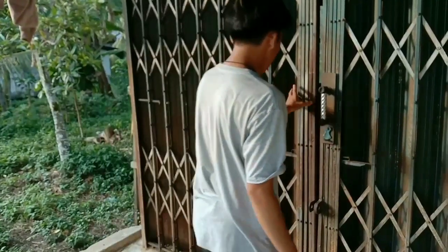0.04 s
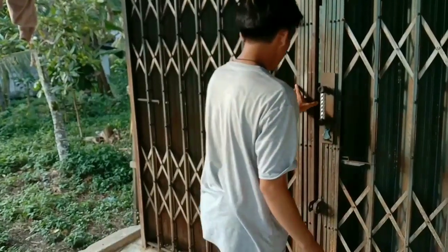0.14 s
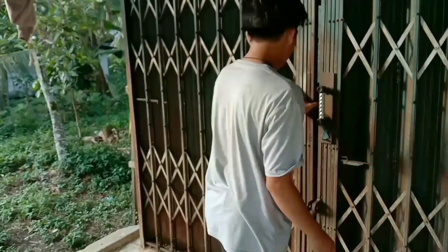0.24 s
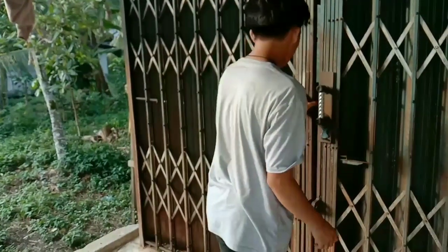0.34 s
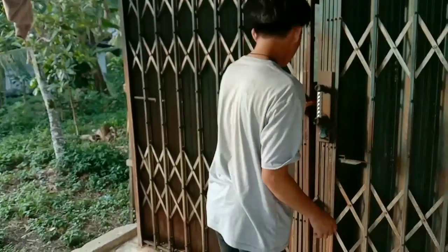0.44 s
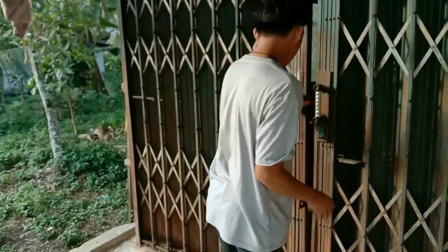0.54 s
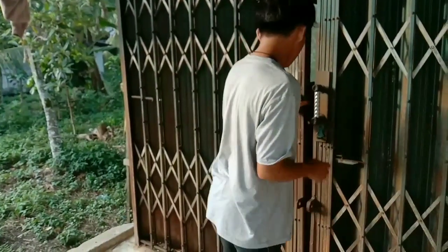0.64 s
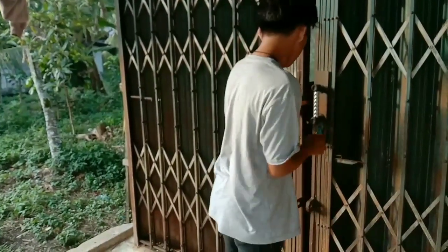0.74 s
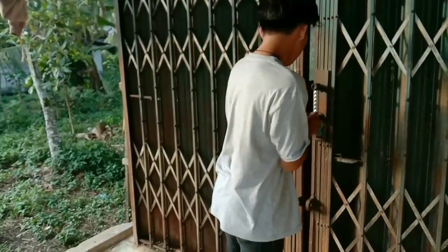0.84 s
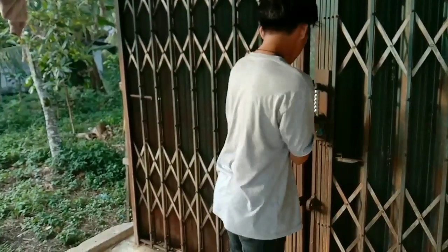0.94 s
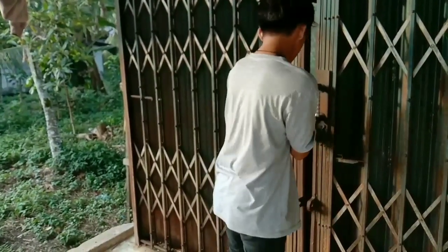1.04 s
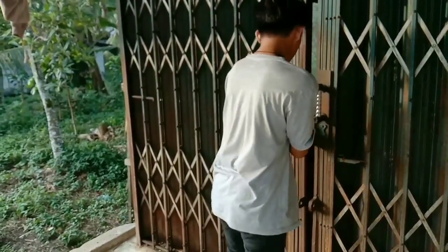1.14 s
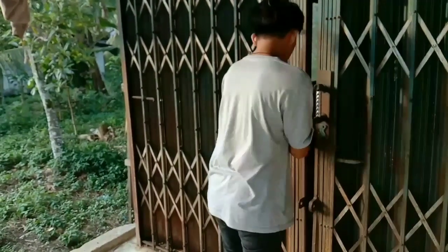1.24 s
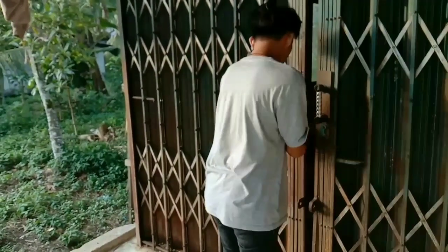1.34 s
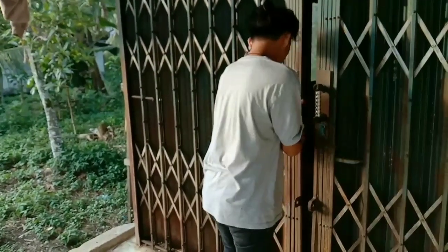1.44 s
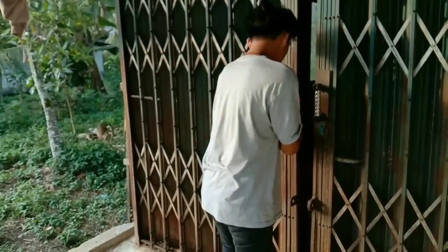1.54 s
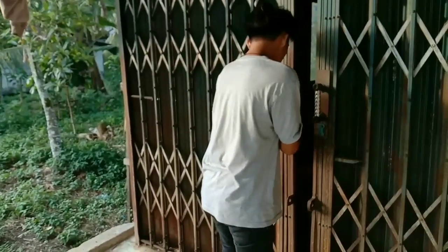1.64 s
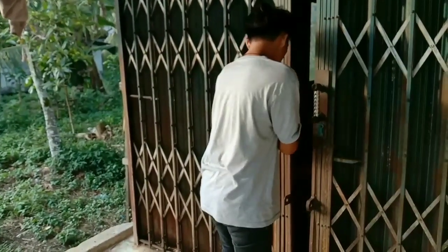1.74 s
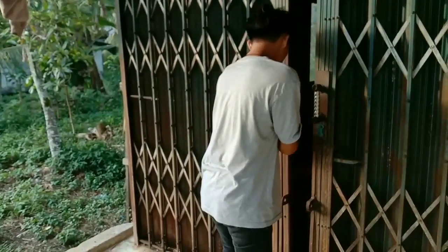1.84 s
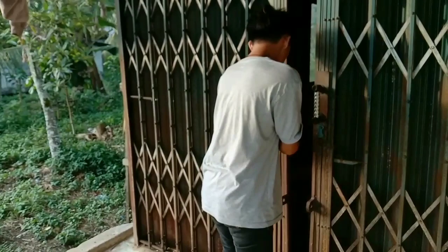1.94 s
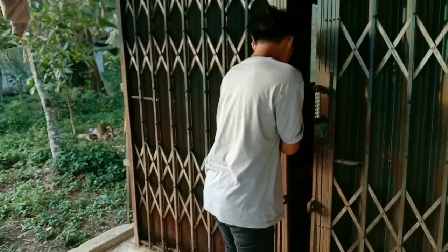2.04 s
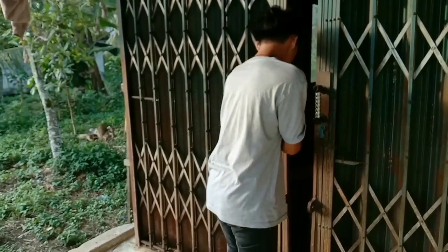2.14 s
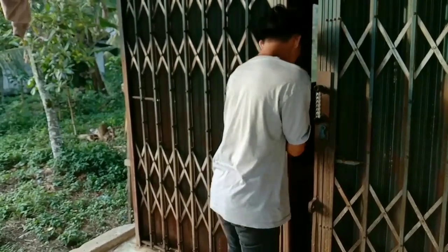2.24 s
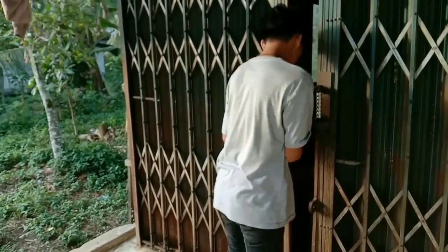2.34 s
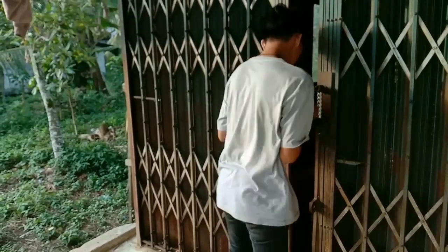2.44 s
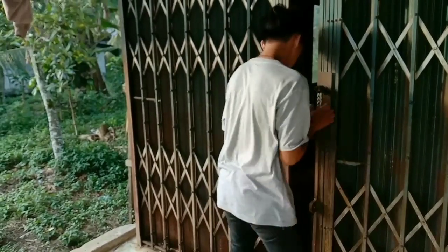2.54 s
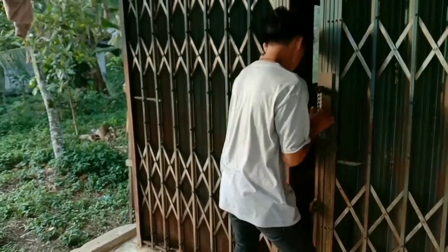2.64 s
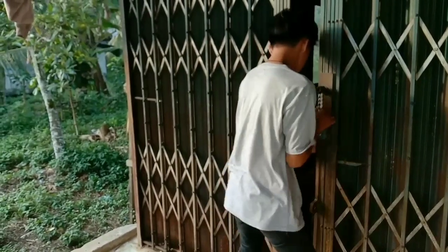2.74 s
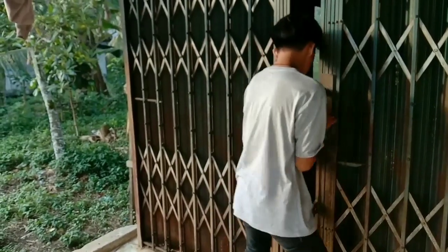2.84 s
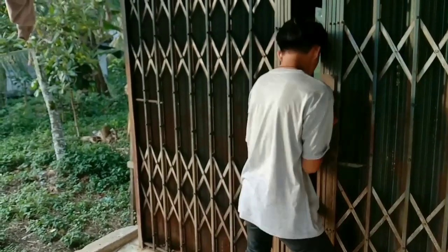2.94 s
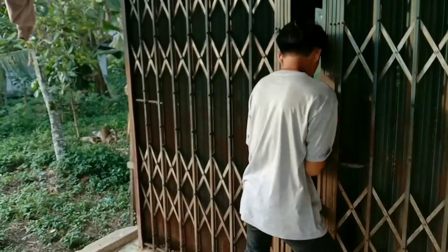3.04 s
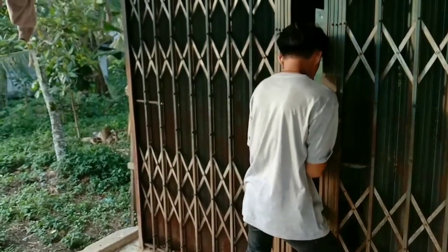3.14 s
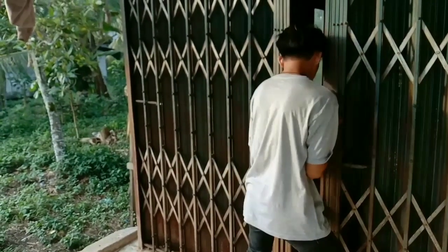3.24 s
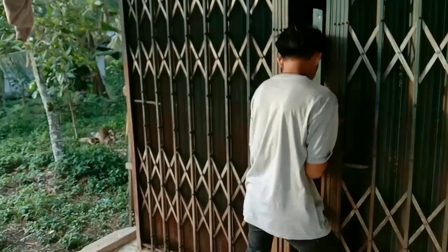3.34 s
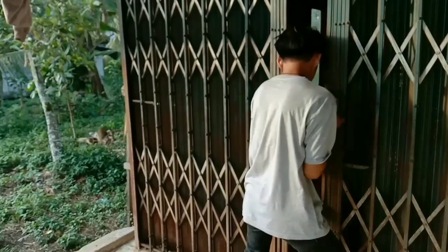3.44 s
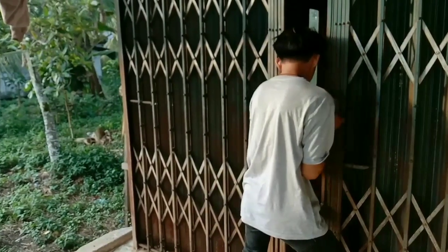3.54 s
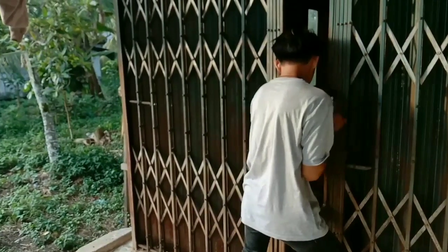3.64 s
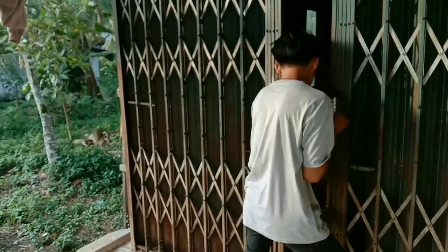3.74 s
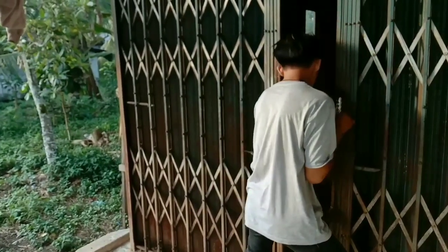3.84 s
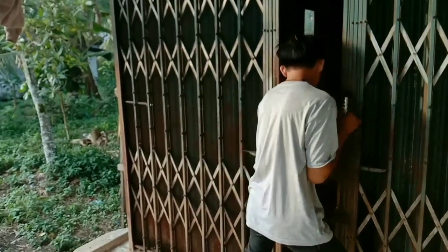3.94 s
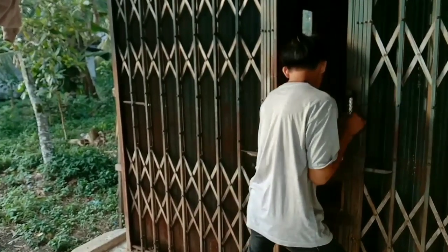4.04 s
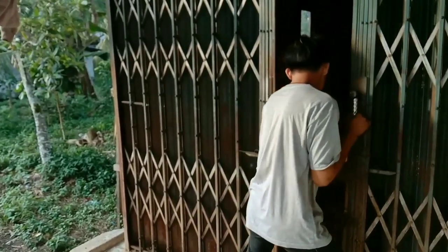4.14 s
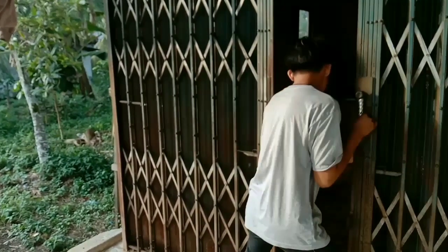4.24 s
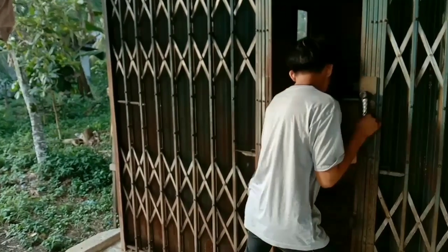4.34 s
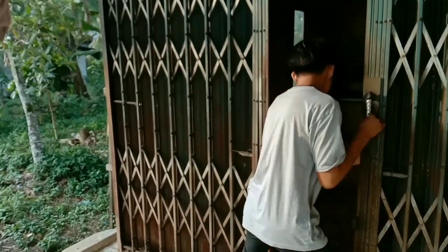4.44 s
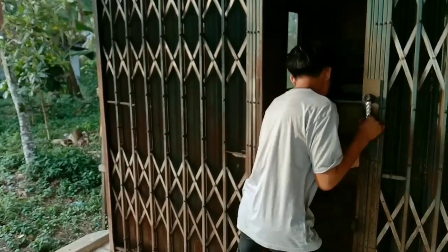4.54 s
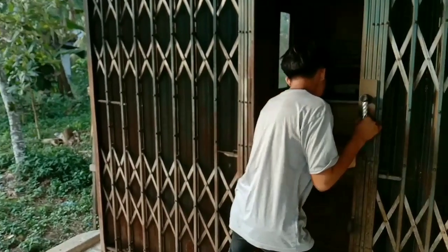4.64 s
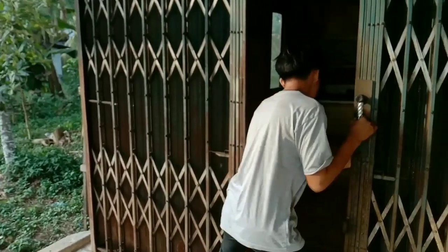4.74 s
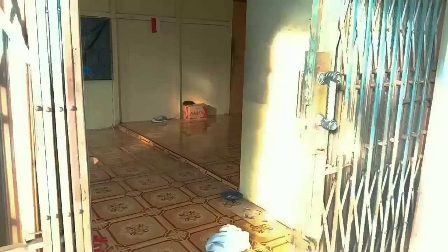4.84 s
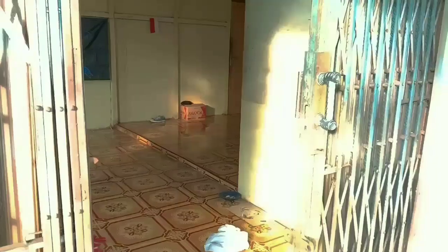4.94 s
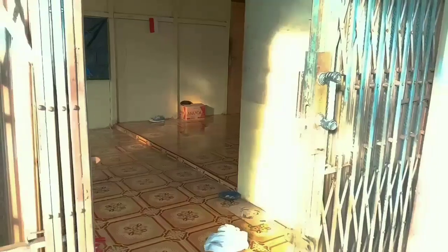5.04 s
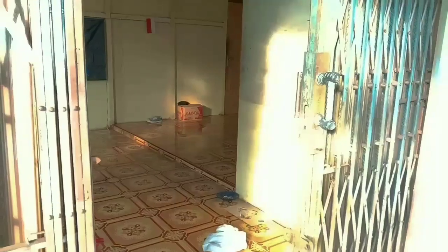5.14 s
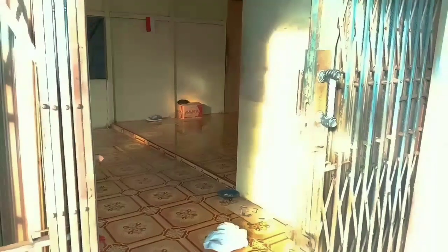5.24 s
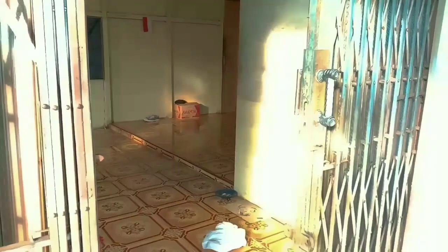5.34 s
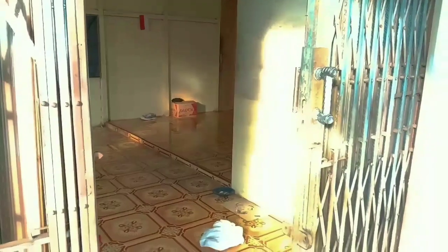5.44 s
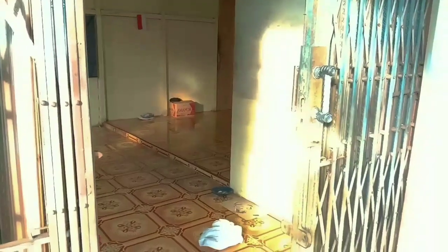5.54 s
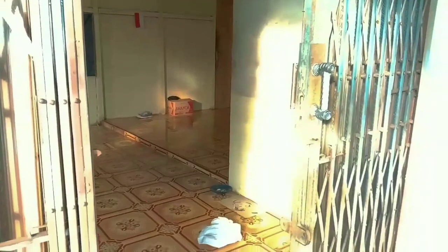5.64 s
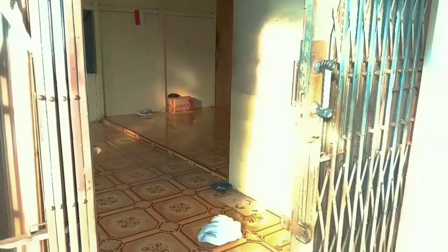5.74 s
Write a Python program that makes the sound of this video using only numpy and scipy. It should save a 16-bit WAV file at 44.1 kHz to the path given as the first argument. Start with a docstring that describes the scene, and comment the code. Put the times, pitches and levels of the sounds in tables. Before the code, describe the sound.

A folding steel gate is unlatched, jerked loose with loud slat clashes, then rumbles and squeals open beside a quiet garden.

```python
"""At a garden entrance, a folding steel gate is unlatched, jerked loose and pushed open.
Slats clash and scrape as showers of tiny contacts through steel resonances; rollers rumble the same way.
Clicks are noise bursts; bars, the groaning frame, squeaking pivots and squealing rollers are wavering tones.
Behind it, insects are narrow noise bands, birds are gliding tones and the air is soft noise.
Everything fades out at the end."""
import sys
import numpy as np
from scipy import signal
from scipy.fft import rfft, irfft
from scipy.io import wavfile
from scipy.ndimage import uniform_filter1d, map_coordinates

SR = 44100
rng = np.random.default_rng(int(sys.argv[2]) if len(sys.argv) > 2 else 0)


def persist_wave(psi):
    """Save psi, clipped to +-1, as 16-bit WAV."""
    counts = np.round(np.clip(psi, -1, 1) * 32767).astype(np.int16)
    wavfile.write(sys.argv[1], SR, np.atleast_2d(counts).T)


N = 255319  # length in samples
TIME = np.arange(N) / SR  # seconds

# All levels in these tables are relative: each sound is also weighted where it is mixed.
# Tone of the outdoor air. Each row: frequency in Hz, noise density in dB per Hz.
AIR_COLOUR = [(25, -8.5), (100, 4), (300, 6.5), (450, 3), (1500, -4.5), (3000, -15), (4500, -19.5),
              (12000, -30)]
# Insects. Each row: centre in Hz, width in Hz, level in dB.
INSECTS = [(7570, 41, -66), (9940, 470, -57)]
# Scrapes of the lock post and latch. Each row: start in seconds, length in seconds,
# rise time in seconds, level in dB.
LATCH_STROKES = [(0.0, 0.05, 0.025, -55.5), (0.086, 0.085, 0.04, -57), (0.387, .05, .02, -46),
                 (0.428, 0.087, 0.047, -26), (1.258, .02, .01, -46.5), (1.288, 0.021, .018, -37.5),
                 (2.87, 0.054, 0.04, -22.5), (3.022, 0.097, .02, -54)]
# Tone of the latch scrape. Each row: frequency in Hz, density in dB per Hz.
LATCH_COLOUR = [(200, -35), (700, -25), (1100, -20), (1700, -3), (2400, 4.5), (3300, -3.5), (4500, -8),
                (6500, -8), (9000, -23.5)]
# The stuck gate juddering free. Each row: start in seconds, length in seconds, level in dB,
# sag in dB per second.
JUDDERS = [(1.511, 0.027, -34, -1), (1.545, .2, -23, 46)]
# Resonances of the judder. Each row: centre in Hz, width in Hz, level in dB.
JUDDER_MODES = [(1196, 86, 0), (1258, 46, 2), (1514, 81, -5.5), (1740, 110, -13.5)]
# Tugs on the stuck gate. Each row: start in seconds, length in seconds, rubbing level in dB,
# sag in dB per second, hiss level in dB, rumble level in dB.
TUGS = [(0.0, 0.11, -67.5, 30, -60, -88), (0.125, 0.044, -85, 3, -50, -88),
        (0.396, 0.072, -50, -120, -46.5, -77), (0.479, 0.091, -31, 90, -29.5, -53),
        (0.672, 0.23, -31.5, 70, -38.5, -49.5), (0.883, 0.075, -44.5, 30, -40.5, -68),
        (0.988, .11, -42.5, 38, -49, -61), (1.14, 0.19, -48, 20.5, -48, -58.5),
        (1.536, 0.28, -24, 43, -29, -52), (1.797, 0.19, -29, 12, -28, -51.5),
        (2.047, 0.24, -34, 31, -39, -48), (2.459, 0.02, -26.5, 61.5, -30, -52),
        (2.52, 0.12, -44.5, 54, -53, -51), (2.678, 0.1, -45.5, 21.5, -43, -57.5),
        (2.876, 0.051, -31, 45.5, -26, -63), (3.004, 0.15, -41.5, 49, -46.5, -51.5)]
# The long slide open. Each row: time in seconds, rubbing level in dB, hiss level in dB, rumble level in dB.
SLIDE = [(3.2, -60, -99, -67), (3.248, -59, -65.5, -58.5), (3.494, -42.5, -45, -45),
         (3.6, -50.5, -60.5, -49), (4.13, -47.5, -55, -47), (4.22, -42, -35, -47), (4.274, -45, -38, -47),
         (4.38, -41, -49.5, -41.5), (4.43, -37.5, -42, -39.5), (4.708, -49.5, -54.5, -42),
         (4.776, -43, -43.5, -42.5), (4.938, -46.5, -57, -45.5), (5.044, -42, -51, -52.5),
         (5.12, -66, -95, -59)]
# Tone of the rubbing steel. Each row: frequency in Hz, density in dB per Hz.
DRAG_COLOUR = [(60, -39.5), (130, -21.5), (260, -10.5), (420, -4), (560, -9), (780, 1.5), (980, -3.5),
               (1270, -0.5), (1600, -0.5), (2500, -2), (3500, -10.5), (5000, -28.5), (9000, -39)]
# Tone of the bright metal hiss. Each row: frequency in Hz, density in dB per Hz.
HISS_COLOUR = [(2000, -25), (3500, 2.5), (4500, -3.5), (5600, 4), (6400, -5.5), (7300, -1), (8200, -20.5),
               (9500, -7.5), (13000, -26), (15500, -20.5)]
# Resonances of the steel slats. Each row: centre in Hz, width in Hz, level in dB.
SLAT_MODES = [(464.4, 130, -9.5), (680, 150, -12), (950, 170, -13.5), (1188.7, 30, 14), (1274, 69, 14),
              (1447, 35, 5), (1740, 100, -3.5), (1920, 73, -2), (2260, 55, -4.5), (2640, 56, -9),
              (2550, 30, -5), (3277, 90, -10.5)]
# Rollers dropping over bumps in the track. Each row: start in seconds, thud level in dB,
# rail knock level in dB.
BUMPS = [(0.695, -47, -38), (2.478, -58, -37), (2.89, -61, -39), (2.98, -49, -46), (3.37, -39, -47),
         (3.45, -44, -52), (3.525, -36.5, -48), (3.61, -40, -47), (3.89, -47, -47), (4.04, -44, -45.5),
         (4.31, -44, -48), (4.45, -35, -34), (4.5, -35, -46.5), (4.656, -35.5, -43), (4.825, -41, -45),
         (5.03, -52, -42.5)]
# Tone of the rolling rumble. Each row: frequency in Hz, density in dB per Hz.
ROLL_COLOUR = [(25, -33.5), (45, -12.5), (85, 3), (140, 5), (210, -7.5), (400, -4), (900, -33.5)]
# Resonances of the hollow bottom rail. Each row: centre in Hz, width in Hz, level in dB.
RAIL_MODES = [(252, 68, -1), (420, 86, -2.5), (803, 300, -3)]
# A thin falling bird call. Each row: time in seconds, pitch in Hz, level in dB.
BIRD_CALL = [(0.15, 7300, -62), (0.175, 6600, -56), (0.22, 6010, -59), (0.26, 5740, -58.5),
             (0.31, 5870, -82)]
# Bird notes. Each row: start in seconds, length in seconds, top pitch in Hz,
# fall at the ends of a full arch in Hz, level in dB, share of the arch that is sung (0 to 1).
CHIRPS = [(0.795, .045, 3550, 400, -51, 1), (0.868, .03, 3850, 1000, -52, .5),
          (0.905, .04, 3700, 700, -53, 1), (2.675, .05, 4600, 1300, -52, 1),
          (3.125, .04, 3600, 900, -53, .6), (3.205, .075, 3700, 950, -52, 1)]
# Slats clashing. Each row: start in seconds, level in dB, time constant of the chatter in seconds,
# treble level in dB on top of the first level.
CLASHES = [(0.232, -31.5, 0.017, -15), (0.45, -19.5, 0.058, 7), (0.496, -12.5, 0.024, -4),
           (0.532, -14.5, 0.023, -4), (0.575, -14.5, 0.017, -6), (0.691, -21, 0.025, -25),
           (1.296, -37.5, 0.042, 24.5), (1.518, -28, 0.061, -18.5), (1.554, -28, 0.04, -19),
           (1.593, -7, 0.1, -7), (1.621, -10, 0.041, 10), (1.687, -5.5, 0.019, 10),
           (1.823, -12, 0.026, 1.5), (1.865, -10.5, 0.1, -4), (2.365, -21.5, 0.023, 13.5),
           (2.48, -18, 0.025, -14), (2.498, -11.5, 0.018, 14), (2.887, -8.5, 0.0086, -7),
           (2.912, -10, 0.015, 3), (2.939, -27, 0.016, 14.5), (4.204, -8, 0.019, 10.5),
           (4.425, -15, 0.078, 12), (4.745, -22, 0.037, -9), (5.02, -22.5, 0.027, 14)]
# Tone of the clashing steel. Each row: frequency in Hz, density in dB per Hz.
CLASH_COLOUR = [(50, -61.5), (120, -30), (280, -13), (550, -8.5), (780, -8), (1000, -14), (1270, 7),
                (1650, 3), (2400, 2), (3300, -3), (4500, -11), (5700, -9), (7300, -13.5), (9500, -35)]
# Pivots and latch clicking. Each row: start in seconds, level in dB, pitch in Hz.
CLICKS = [(0.4998, -22, 5700), (0.9454, -43, 5570), (2.1614, -31, 5350), (2.2534, -46, 5360),
          (2.3628, -29, 6650), (2.4814, -23.5, 6040), (2.9481, -18, 6760), (3.023, -26, 7200),
          (3.3044, -34.5, 7040), (3.4032, -38, 6950), (4.4184, -22, 6100), (4.5919, -20.5, 6650),
          (4.6021, -22, 6700), (4.6526, -27.5, 6900), (4.777, -24.5, 7400), (5.024, -42.5, 5540),
          (5.0439, -32.5, 8160)]
# Tone shaping of the clicks. Each row: frequency in Hz, gain in dB.
CLICK_COLOUR = [(100, -23.0), (600, -1.5), (2500, 0), (7200, 3), (8300, -4), (10000, 3.0), (15000, -11.0)]
# Dry rollers squealing. Each row: start in seconds, length in seconds, pitch in Hz, level in dB,
# sag in dB per second.
SQUEALS = [(0.535, 0.12, 11460, -54, 0), (0.635, 0.043, 11490, -34.5, -11), (0.702, .055, 11480, -28, 30),
           (0.771, 0.14, 11360, -33.5, 88), (0.814, 0.042, 10970, -41, 2), (1.455, 0.086, 11430, -42, -120),
           (1.532, 0.63, 11430, -32, 12), (1.54, .32, 11050, -30.5, -6.5), (1.88, 0.028, 11560, -24, 0),
           (1.923, 0.28, 10980, -31, 55), (1.957, 0.29, 11350, -37.5, 18), (2.452, .03, 11400, -49, 0),
           (3.12, 0.054, 11330, -34, 0), (3.175, .095, 11320, -27.5, -30), (3.268, 0.34, 11350, -20, 37),
           (3.41, 0.56, 11490, -25.5, -2), (3.917, .05, 11310, -22, 0.5), (3.996, .11, 11270, -23.5, -25),
           (4.243, 0.052, 11380, -20.5, -3.5), (4.436, 0.024, 10980, -21.5, -4.5),
           (4.492, 0.042, 11330, -22, 4), (4.56, 0.038, 11050, -26.5, 0), (4.6, 0.097, 11390, -27, -40),
           (4.647, .14, 11480, -22, 42), (4.812, 0.06, 11320, -27.5, 0), (4.886, 0.053, 11440, -29.5, 0),
           (4.936, 0.08, 11320, -27, 4), (5.026, 0.086, 11450, -33, -39.5)]
# Tone of the rasp that shakes the squeals. Each row: frequency in Hz, density in dB per Hz.
RASP_COLOUR = [(100, 3.0), (250, 7), (600, -10), (1500, -17.5), (3000, -40.5), (6000, -66.5)]
# Brief squeaks of the pivots. Each row: start in seconds, length in seconds, pitch in Hz, level in dB,
# level of the octave above in dB.
SQUEAKS = [(1.44, 0.061, 3710, -56, -20), (3.7, 0.084, 3590, -48, -25), (4.01, 0.094, 3524, -45.5, -27),
           (4.902, 0.074, 3225, -34, -8.5), (5.035, 0.032, 8400, -42, -40)]
# The frame sticking and slipping. Each row: time in seconds, level in dB.
GROAN = [(1.6, -43), (1.65, -34), (1.752, -38.5), (1.862, -31), (2.072, -38.5), (2.144, -56), (2.328, -53),
         (2.4, -53)]
# Overtones of the groan. Each row: multiple of the pitch, level in dB, extra level at the hardest pull in dB.
GROAN_OVERTONES = [(2, -5, 9.5), (3, -6.5, 5.5), (4, -15.5, 19.5), (5, -14.5, 24), (6, -19.5, 10.5)]
# Ringing tones of two lattice bars. Each row: pitch in Hz, level in dB, time to fall by 60 dB in seconds.
SHORT_BAR_MODES = [(1510, -3, .25), (1565, -1, .28), (2630, -10, .25), (2930, -6, .25), (3100, -6, .22)]
LONG_BAR_MODES = [(1665, 0, .3), (2395, -7, .45), (3340, -4, .28), (5040, -8, .28), (5900, -14, .25),
                  (6670, -7, .2)]
# The level over time, ending in the fade. Each row: time in seconds, gain in dB.
FADE = [(5.07, 2), (5.13, 2), (5.16, -12), (5.19, -18.5), (5.21, -93)]


def undb(db):
    """Turn decibels into gain."""
    return 10 ** (np.asarray(db) / 20)


def unit(x):
    """Scale to an rms of 1."""
    return x / np.sqrt(np.mean(x ** 2) + 1e-18)


def curves(table):
    """Join the rows of a table by straight lines in time, one curve for each further column."""
    s, *columns = np.transpose(table)
    return [np.interp(TIME, s, column) for column in columns]


def during(table):
    """A switch that is 1 while a table lasts, with edges softened over 10 ms."""
    first, last = table[0][0], table[-1][0]
    return uniform_filter1d(1. * ((TIME >= first) & (TIME <= last)), SR // 100)


def walk(rate, size=N):
    """Smooth random wandering at rms 1, through `rate` random points a second."""
    knots = rng.standard_normal(8192)
    return unit(map_coordinates(knots, [TIME[:size] * rate], order=2, mode="wrap"))


def colour(x, points):
    """Filter by a (Hz, dB) spectrum without looking ahead, keeping the power of white noise."""
    size = 4096
    hz, db = np.transpose(points)
    grid = np.linspace(1, SR / 2, size // 2 + 1)
    gain = unit(undb(np.interp(np.log(grid), np.log(hz), db)))
    # Folding the cepstrum puts the filter's energy as early as possible.
    fold = np.r_[1, np.full(size // 2 - 1, 2), np.zeros(size // 2)]
    cepstrum = irfft(np.log(gain)) * fold
    return signal.oaconvolve(x, irfft(np.exp(rfft(cepstrum))))[:len(x)]


def band(x, hz, width):
    """One resonance; a narrower one rings longer."""
    return signal.lfilter(*signal.iirpeak(hz, hz / width, fs=SR), x)


def decay(t60):
    """One second of dying away, falling 60 dB in t60 seconds."""
    return np.exp(-np.log(1000) * TIME[:SR] / t60)


def envelope(length, attack, release, sag=0):
    """One second of level: rise, hold sagging by so many dB a second, and 60 dB release (times in s)."""
    t = TIME[:SR]
    rise = np.sin(np.pi / 2 * np.minimum(t / max(attack, 1 / SR), 1)) ** 2
    hold = undb(-sag * np.minimum(t, length))
    fall = np.exp(-np.log(1000) * np.maximum(t - length, 0) / release)
    return rise * hold * fall


def tail(x, t60, damping):
    """A dense, diffuse ring; above 3500 Hz it dies `damping` times as fast."""
    noise = rng.standard_normal(SR)
    low = signal.sosfilt(signal.butter(2, 3500, fs=SR, output="sos"), noise)
    high = signal.sosfilt(signal.butter(2, 3500, "high", fs=SR, output="sos"), noise)
    ring = low * decay(t60) + high * decay(t60 / damping)
    return signal.fftconvolve(x, unit(ring) / np.sqrt(SR))[:N]


def contacts(rate, spread_db):
    """Tiny metal contacts of uneven size at random moments, about `rate` a second, at rms 1."""
    size = undb(spread_db * np.minimum(rng.exponential(size=N), 3))
    hits = rng.random(N) < rate / SR
    return unit(hits * size * rng.choice([-1, 1], N))


def add(track, s, sound):
    """Mix a sound in at a time in seconds."""
    start = max(int(s * SR), 0)
    track[start:start + len(sound)] += sound[:N - start]


def garden():
    """Insects shrill as narrow, flickering noise bands over slowly swelling outdoor air."""
    out = undb(-69 + 0.9 * walk(1.9)) * colour(rng.standard_normal(N), AIR_COLOUR)
    for hz, width, db in INSECTS:
        shrill = unit(band(band(rng.standard_normal(N), hz, width), hz, width))
        out += shrill * undb(db + 2.3 * walk(32))
    return out


def rubbing():
    """The latch scrapes along its post, and the stuck gate judders in the rails as it comes free."""
    stroke, judder = np.zeros((2, N))
    for s, length, rise, db in LATCH_STROKES:
        add(stroke, s, undb(db) * envelope(length, rise, release=0.17))
    for s, length, db, sag in JUDDERS:
        add(judder, s, undb(db) * envelope(length, attack=.008, release=0.13, sag=sag))
    latch = undb(-5.5) * colour(contacts(rate=2700, spread_db=-3.0) * stroke, LATCH_COLOUR)
    slips = contacts(rate=900, spread_db=0.5)
    rails = np.zeros(N)
    for k, (hz, width, db) in enumerate(JUDDER_MODES):
        rails += (-1) ** k * undb(db) * band(slips, hz, width)
    steel = latch + undb(-3.5) * unit(rails) * judder
    return steel + undb(-6) * tail(steel, t60=0.14, damping=6.1)


def motion():
    """How strongly the gate rubs, hisses and rumbles: first tugs, then one long slide, added as power."""
    attack, release = 0.029, 0.41  # seconds
    rub, hiss, roll = np.zeros((3, N))
    for s, length, rub_db, sag, hiss_db, roll_db in TUGS:
        tug = envelope(length, attack, release, sag)
        # The heavy frame settles more slowly than the slats.
        heavy_tug = envelope(length, attack, release, sag * .5)
        add(rub, s, (undb(rub_db) * tug) ** 2)
        add(hiss, s, (undb(hiss_db) * tug) ** 2)
        add(roll, s, (undb(roll_db) * heavy_tug) ** 2)
    weights = undb([6.5, 9, -2])[:, None]  # rubbing, hiss and rumble of the slide
    slide = during(SLIDE) * undb(curves(SLIDE)) * weights
    return np.sqrt(np.array([rub, hiss, roll]) + slide ** 2)


def slat_ring(x):
    """The resonances of the folded steel strips, keeping the power of white noise."""
    click = signal.unit_impulse(SR // 2)
    ring = np.zeros(SR // 2)
    for k, (hz, width, db) in enumerate(SLAT_MODES):
        ring += (-1) ** k * undb(db) * band(click, hz, width)
    return signal.fftconvolve(x, ring / np.linalg.norm(ring))[:N]


def drag(rub, hiss):
    """Rusty slats and pins rub in uneven slips; the sheets ring on."""
    grip = undb(1.4 * walk(40))
    slips = contacts(rate=1500, spread_db=2.5) * rub * grip
    grit = contacts(rate=2800, spread_db=-1.0) * hiss * grip
    steel = undb(-5.5) * colour(slips, DRAG_COLOUR)
    steel += undb(-8) * slat_ring(slips)
    steel += undb(-4.0) * colour(grit, HISS_COLOUR)
    return steel + undb(-1.5) * tail(steel, t60=0.039, damping=1.23)


def rail_ring(x):
    """The resonances of the hollow bottom rail, at rms 1."""
    return unit(sum(undb(db) * band(x, hz, width) for hz, width, db in RAIL_MODES))


def rumble(roll):
    """The rollers bump over the track, shake the whole gate and knock in the hollow rail."""
    attack = 0.0054  # seconds; the release starts as the rise ends
    thuds, blows = np.zeros((2, N))
    for s, thud_db, knock_db in BUMPS:
        add(thuds, s, undb(thud_db) * envelope(attack, attack, release=0.14))
        add(blows, s, undb(knock_db) * envelope(attack, attack, release=0.25))
    rolling = colour(contacts(rate=500, spread_db=1.0), ROLL_COLOUR)
    shake = undb(-0.5) * rolling * np.hypot(roll, thuds)
    joints = tail(rail_ring(np.abs(contacts(rate=70, spread_db=4))), t60=0.099, damping=1.7)
    knocks = undb(-2) * joints * roll
    knocks += undb(-2) * rail_ring(contacts(rate=1500, spread_db=0.5)) * blows
    return (shake + knocks) * undb(1.0 * walk(24))


def birds():
    """Arched notes and one falling call glide in pitch, scattered by the leaves."""
    hz, call_db = curves(BIRD_CALL)
    phase = 2 * np.pi * np.cumsum(hz * (1 + 0.018 * walk(751))) / SR
    song = during(BIRD_CALL) * undb(call_db) * np.sin(phase)
    for s, length, top_hz, fall_hz, db, share in CHIRPS:
        along = np.linspace(-1, 1, int(length * SR))
        arch = share * (along + 1) - 1  # a share below 1 stops before the arch is complete
        phase = 2 * np.pi * np.cumsum(top_hz - fall_hz * arch ** 2) / SR
        add(song, s, undb(db) * np.sqrt(1 - along ** 4) * np.sin(phase))
    song *= undb(3 * walk(90))
    return undb(5) * song + undb(3.5) * tail(song, t60=0.3, damping=1.2)


def clashes():
    """Each blow sets the loose slats chattering against their neighbours."""
    force, edge = np.zeros((2, N))  # power of the body and of the treble
    for s, db, length, treble_db in CLASHES:
        power = undb(2 * db) * np.exp(-2 * TIME[:SR] / length)
        add(force, s, power)
        add(edge, s, power * undb(2 * treble_db))
    chatter = contacts(rate=3000, spread_db=1.5)
    blows = chatter * np.sqrt(force)
    steel = undb(-17.5) * colour(blows, CLASH_COLOUR)
    steel += undb(-27.5) * slat_ring(blows)
    steel += undb(-30.0) * colour(chatter * np.sqrt(edge), HISS_COLOUR)
    return steel + undb(-5.5) * tail(steel, t60=0.44, damping=1.9)


def clicks():
    """Pins snap across the play in their holes: a crack with a brief bright ring."""
    out = np.zeros(N)
    for s, db, hz in CLICKS:
        crack = rng.standard_normal(SR) * (decay(0.012) + undb(3.0) * decay(0.051))
        ring = band(crack, hz, width=830)
        add(out, s, undb(db) * (undb(-9.5) * ring + undb(-12.5) * crack))
    out = colour(out, CLICK_COLOUR)
    return out + undb(2.5) * tail(out, t60=0.4, damping=2.1)


def rollers():
    """Dry rollers catch and sing on high modes that drift and tremble; rust rasps around each tone."""
    tone = np.zeros(N)
    for s, length, hz, db, sag in SQUEALS:
        pitch = hz + 14 * walk(14, size=SR) + 24 * walk(170, size=SR)  # slow drift and fast waver in Hz
        flutter_db = 3.5 * walk(90, size=SR)
        swell = envelope(length, attack=.036, release=.12, sag=sag) * undb(db + flutter_db)
        add(tone, s, swell * np.sin(2 * np.pi * np.cumsum(pitch) / SR))
    rasp = colour(rng.standard_normal(N), RASP_COLOUR)
    tone *= 1 + undb(-13.5) * rasp
    return undb(5.0) * tone + undb(-7.0) * tail(tone, t60=.35, damping=0.94)


def squeaks():
    """A dry pivot turns and sings for a moment, a trembling tone with its octave."""
    out = np.zeros(N)
    for s, length, hz, db, octave_db in SQUEAKS:
        swell = np.hanning(int(length * SR))
        pitch = hz * (1 + 0.0056 * walk(300, size=len(swell)))
        phase = 2 * np.pi * np.cumsum(pitch) / SR
        tone = np.sin(phase) + undb(octave_db) * np.sin(2 * phase)
        add(out, s, undb(db) * swell * tone)
    return out + undb(2.5) * tail(out, t60=0.13, damping=2.8)


def groan():
    """Stick and slip in the frame: a rough tone whose overtones flare as it is forced."""
    level_db, = curves(GROAN)
    pull = np.zeros(N)
    add(pull, 1.8, envelope(length=0.022, attack=0.0088, release=0.4))  # the hardest pull
    pitch = 569 * (1 + 0.0044 * walk(120))  # Hz
    phase = 2 * np.pi * np.cumsum(pitch) / SR
    tone = undb(-1.5 + 2.64 * walk(54)) * np.sin(phase)
    for multiple, partial_db, flare_db in GROAN_OVERTONES:
        overtone_db = partial_db + flare_db * pull + 3.4 * walk(55)
        tone += undb(overtone_db) * np.sin(multiple * phase)
    tone *= during(GROAN) * undb(level_db)
    return tone + undb(-11.0) * tail(tone, t60=.3, damping=2.1)


def bar(s, modes, db, rub_s, buzz_hz):
    """A lattice bar is caught and rubbed briefly; it buzzes in its loose rivets as it rings."""
    t = TIME[:SR]
    rub = (1 - np.exp(-t / rub_s)) ** 2
    out = np.zeros(N)
    for hz, mode_db, t60 in modes:
        # Higher tones waver more; buzz_hz is the spread of the pitch at 1000 Hz.
        pitch = hz + buzz_hz * np.sqrt(hz / 1000) * walk(350, size=SR)
        phase = 2 * np.pi * np.cumsum(pitch) / SR
        level = undb(db + mode_db + 5.6 * walk(160, size=SR))
        add(out, s, level * rub * decay(t60) * np.sin(phase))
    return out + undb(1) * tail(out, t60=0.23, damping=1.6)


def scene():
    """The gate in front of the garden."""
    bars = bar(4.197, LONG_BAR_MODES, db=-19, rub_s=.003, buzz_hz=25.8)
    bars += bar(3.45, SHORT_BAR_MODES, db=-30, rub_s=0.0089, buzz_hz=24.26)
    rub, hiss, roll = motion()
    gate = clashes() + drag(rub, hiss) + rubbing() + rumble(roll)
    gate += clicks() + bars + groan() + squeaks() + rollers()
    return (gate + garden() + birds())[None]


def record(dry):
    """Fade the sound out and cut everything above 15800 Hz."""
    fade_db, = curves(FADE)
    low_pass = signal.ellip(10, .2, 80, 15800, fs=SR, output="sos")
    return signal.sosfilt(low_pass, dry * undb(fade_db))


dry = scene()
out = record(dry)
persist_wave(out)
```